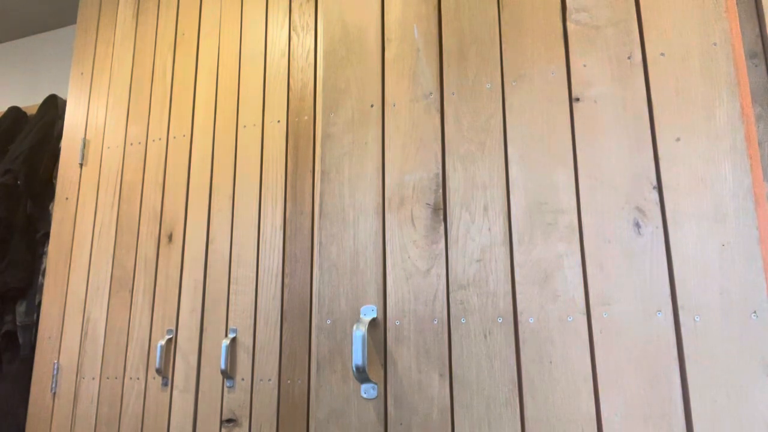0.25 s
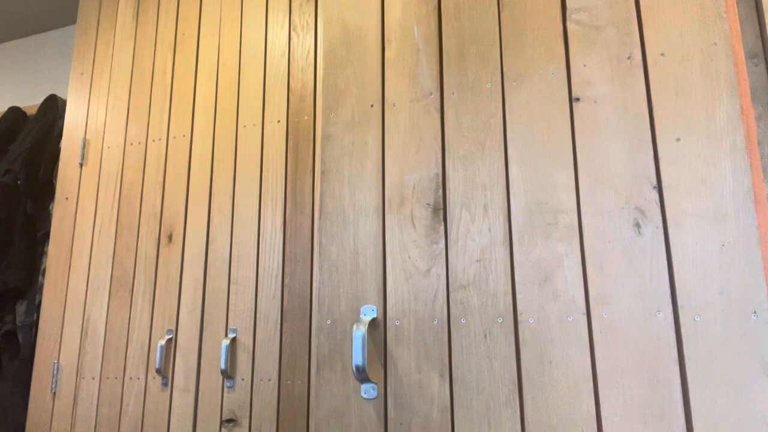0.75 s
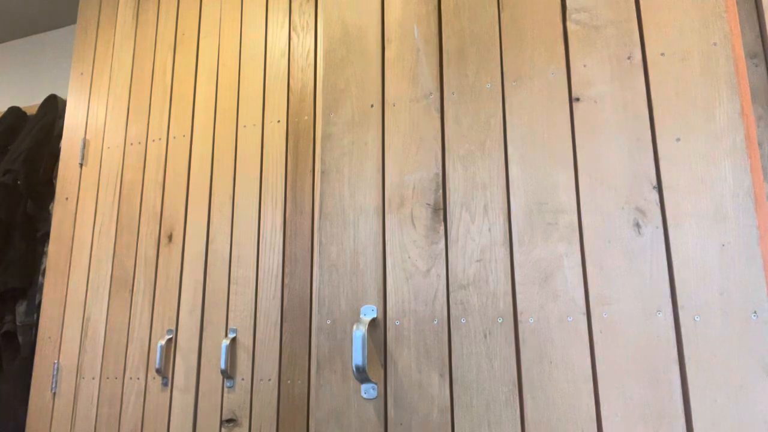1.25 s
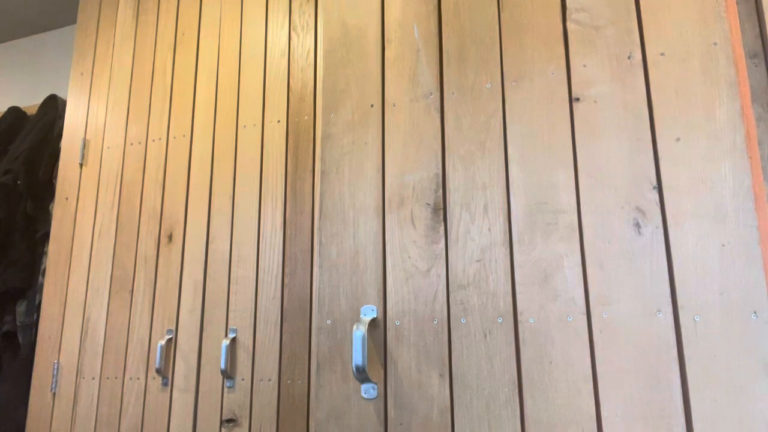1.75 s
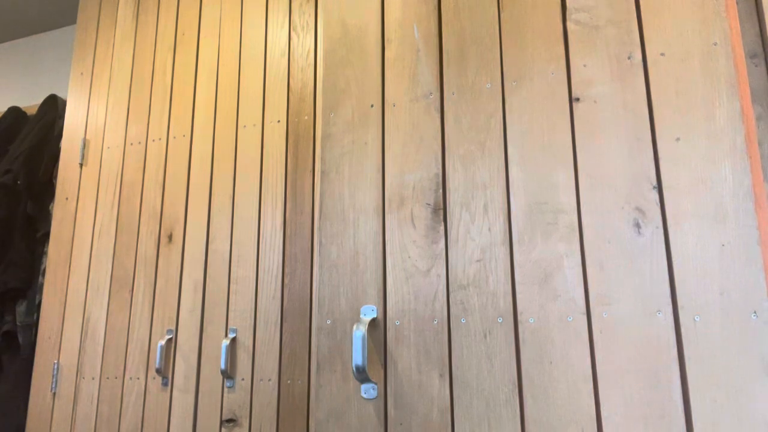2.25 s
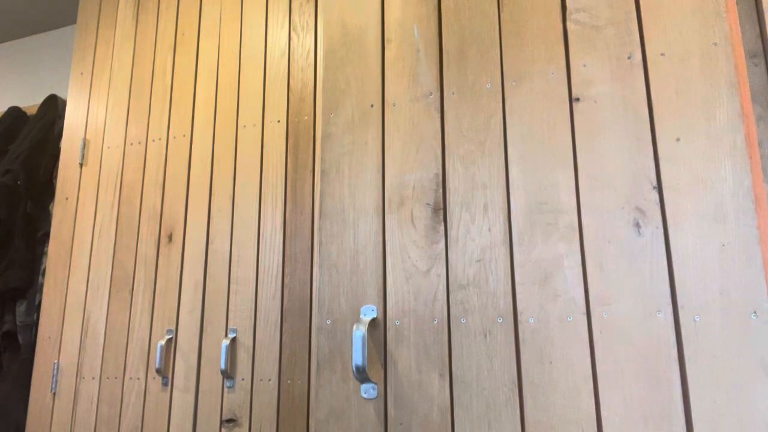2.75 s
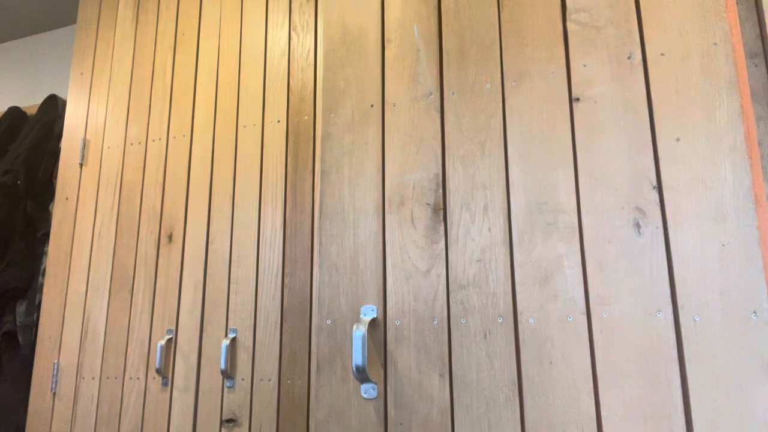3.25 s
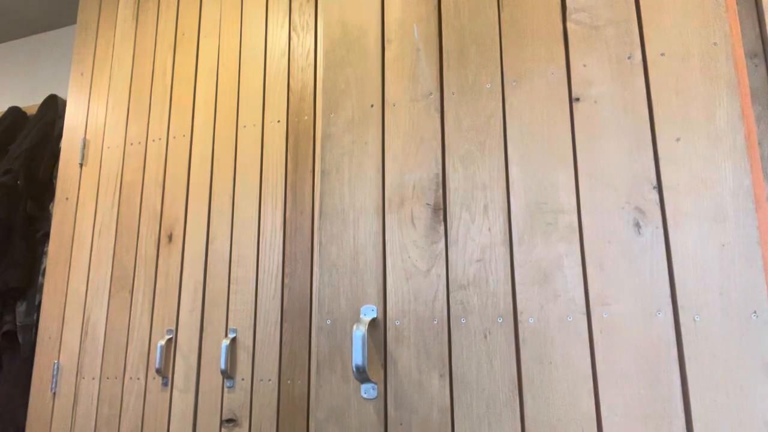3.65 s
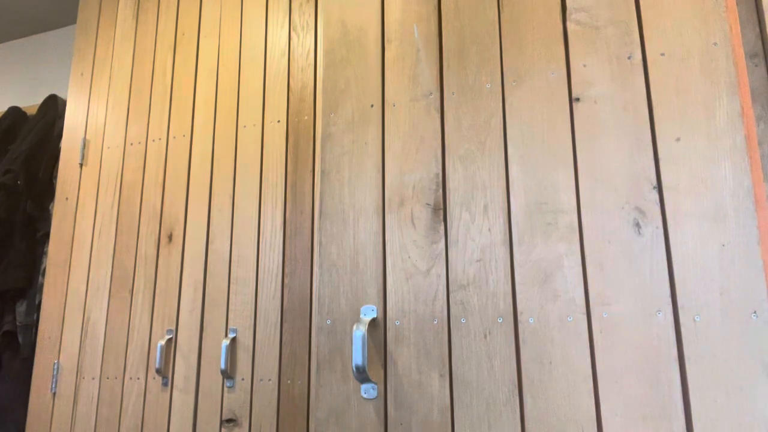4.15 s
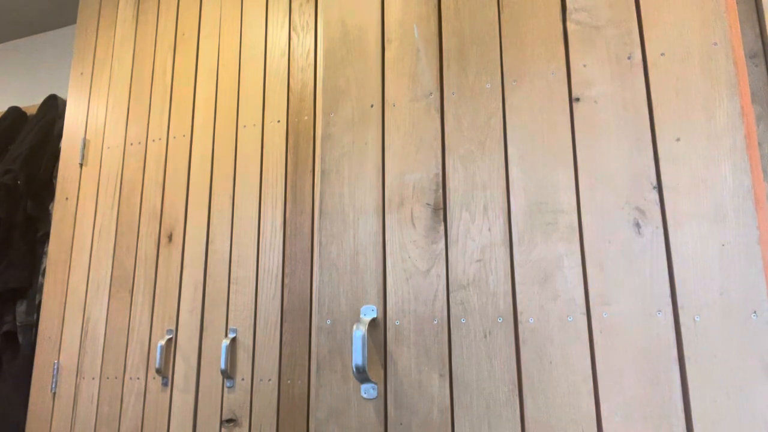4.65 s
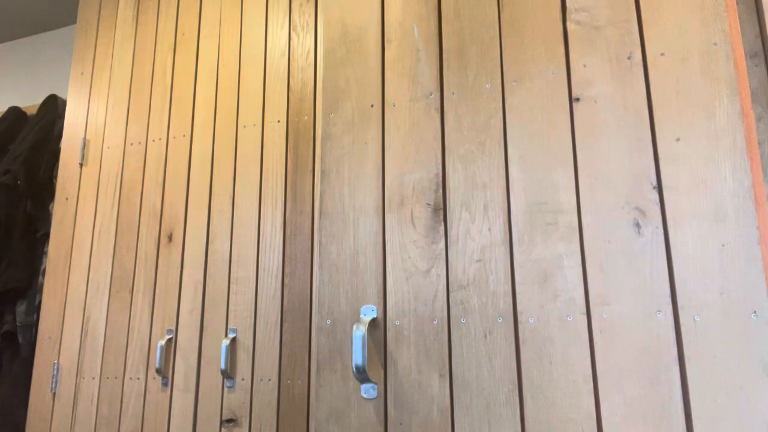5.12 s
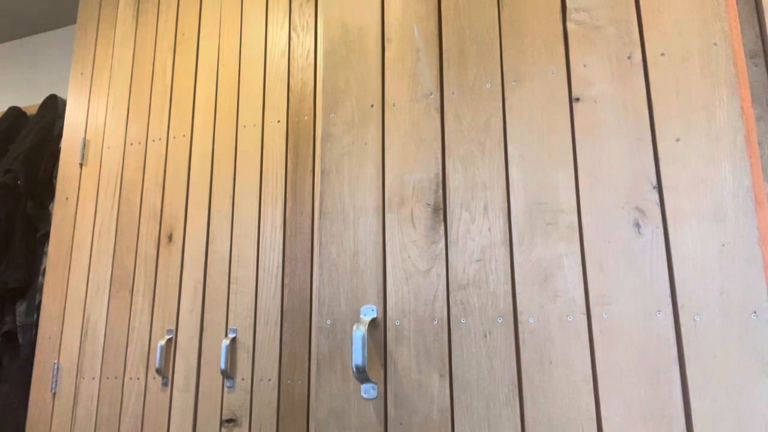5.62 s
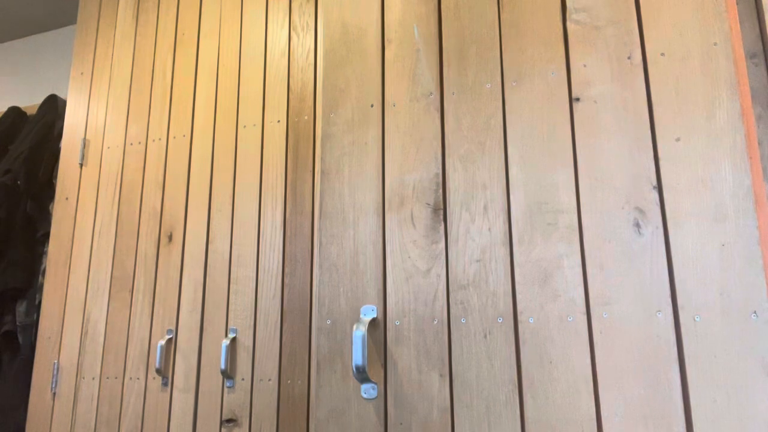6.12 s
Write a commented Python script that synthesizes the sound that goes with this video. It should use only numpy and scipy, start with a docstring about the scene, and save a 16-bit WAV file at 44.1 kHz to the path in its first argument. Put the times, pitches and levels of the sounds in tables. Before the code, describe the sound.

A clothes dryer runs for about six and a half seconds, heard from outside the closed wooden doors of a closet. A steady low motor and blower hum sits on a cabinet rumble, which swells slightly around 0.7, 1.5, 4.6 and 6 seconds. From the start, laundry lands in the steel drum with soft, irregular, dully ringing thumps, several a second, each blurred by the closet's short echo. Clearer ones fall near 1.1, 2 and 3.3 seconds, the strongest at 5.3, and another at 6.3. Zips and buttons click and jingle lightly on the steel, often together with the thumps, most noticeably around 1.1, 2.2, 3.3 and 4.3 seconds. At about 3 seconds a brief, soft mechanical moan slides down in pitch. Cloth rubs faintly along the drum throughout, over a very faint microphone hiss.

```python
"""Clothes dryer in a closet

Behind closed plank doors, falling laundry thumps the steel drum while zips and buttons clatter on it.
The closet's echoes blur every blow. Air and rolling noise rumble in the cabinet, and the motor, blower
and drum roller hum. Cloth rubs the drum, a brief moan falls in pitch, and the microphone hisses."""
import sys
import numpy as np
from scipy import signal
from scipy.fft import rfft, irfft, next_fast_len
from scipy.io import wavfile
from scipy.ndimage import uniform_filter1d

SR = 44100
rng = np.random.default_rng(int(sys.argv[2]) if len(sys.argv) > 2 else 0)


def dump_mix(stems):
    """Bounce the given channels to the path in sys.argv[1] as a 16-bit WAV at rate SR."""
    frames = np.atleast_2d(stems).T  # one column per channel
    limited = np.clip(frames, -1, 1)  # hard clip at full scale
    pcm = np.round(limited * 32767).astype(np.int16)
    wavfile.write(sys.argv[1], SR, pcm)


N = 281358
T = np.arange(N) / SR
LEAD_S = 0.01006   # clatter starts this long before its listed time, a thump a little less


# The notes at which the steel drum rings, heard through the doors.
# Each row: pitch in Hz, width in Hz, level in dB.
DRUM_NOTES = [(209.3, 7.1, 9.5), (400.8, 19, 2.5), (501, 11, -2.5), (571, 43, -10), (711.4, 18, -2),
              (761, 18, 0), (814, 24, -4.5), (879.6, 51, -3), (947, 19, -1), (973, 28, -5),
              (1040.6, 25, 0.5), (1077.4, 24, -3.5), (1140, 29, -2.5), (1220, 37, -11.5), (1282, 40, -7.5),
              (1375, 31, -6.5), (1448.6, 26, -6.5), (1537, 43, -7), (1652, 50, -10), (1790, 48, -13.5),
              (2040, 80, -17.5), (2370, 110, -22.5), (2520, 100, -36)]
# The laundry lands. Each row: time in seconds, peak level in dB, centre pitch in Hz,
# spread to either side in octaves, seconds for the echo to fade by 60 dB.
LANDINGS = [(0.072, -39, 1230, 0.46, 0.13), (0.098, -39.5, 1090, 0.46, 0.29),
            (0.306, -43, 1140, 0.65, 0.41), (0.44, -50.5, 1310, 1.1, 0.37), (0.652, -60, 740, 0.13, 0.22),
            (0.916, -44.5, 814, 0.88, 0.3), (1.113, -35, 940, 0.86, 0.23), (1.169, -43, 953, 1.1, 0.27),
            (1.518, -46, 770, 0.59, 0.97), (1.652, -47, 835, 1.1, 0.78), (1.741, -47, 1090, 0.47, 0.1),
            (1.977, -36.5, 1260, 0.54, 0.3), (2.139, -46, 780, 0.92, 0.27),
            (2.243, -42.5, 1330, 0.49, 0.43), (2.33, -44, 1470, 0.24, 0.13),
            (2.451, -54.5, 800, 0.84, 0.65), (2.763, -48, 910, 0.5, 0.27), (2.852, -47.5, 1220, 0.16, 0.33),
            (3.071, -42, 795, 0.85, 0.46), (3.291, -39.5, 910, 0.56, 0.35), (3.338, -40, 1030, 0.51, 0.37),
            (3.351, -43, 235, 0.13, 0.17), (3.655, -53, 940, 0.35, 0.29), (3.669, -39.5, 228, 0.16, 0.16),
            (3.817, -48, 1110, 0.84, 0.35), (3.891, -47, 1120, 0.21, 0.24), (3.986, -60, 744, 0.29, 0.26),
            (4.306, -40, 1260, 0.57, 0.75), (4.454, -56, 1150, 0.77, 0.079),
            (4.586, -50.5, 744, 0.49, 0.15), (5.028, -35, 1240, 0.17, 0.073),
            (5.066, -46.5, 1190, 0.2, 0.22), (5.258, -32.5, 826, 0.99, 0.48), (5.27, -34, 236, 0.086, 0.22),
            (5.284, -28.5, 830, 0.77, 0.25), (5.498, -53.5, 980, 0.31, 0.25),
            (5.919, -59.5, 770, 0.24, 0.14), (5.987, -54, 673, 0.33, 0.98), (6.268, -50, 1310, 0.36, 0.43),
            (6.307, -34.5, 1050, 0.51, 0.28)]

def laundry_thumps():
    """Each landing rings the drum notes near its centre pitch, and the closet's echo draws it out."""
    out, length = np.zeros(N + SR), SR // 2
    t = T[:length]
    spots_db = 2.7 * rng.standard_normal((len(LANDINGS), len(DRUM_NOTES)))
    for (time_s, db, centre_hz, spread, fade_s), spot_db in zip(LANDINGS, spots_db):
        strike = 0.89 * swell(t, rise_s=0.0016, fade_s=0.018)
        echo = swell(t, rise_s=0.004, fade_s=fade_s)
        burst = rng.standard_normal(length) * (strike + echo)
        # The size and softness of the piece set its range of pitches.
        edges_hz = centre_hz * 2 ** (np.array([-1, 1]) * np.clip(spread, .1, 2))
        burst = keep_band(burst, edges_hz)
        # Each spot on the drum favours different notes.
        notes = [(hz, width, level + extra) for (hz, width, level), extra in zip(DRUM_NOTES, spot_db)]
        ring = ring_notes(burst, notes)
        start = round((time_s - .8 * LEAD_S) * SR)
        out[start:start + length] += from_db(db) * ring / np.abs(ring).max()
    return out[:N]


# The tone of the clatter's four layers, from low to high. Each row: pitch in Hz, relative level in dB.
KNOCK_TONE = [(1500, -18), (1900, -1.5), (2400, -8.5), (2700, -11.5), (3100, -38.5)]
CLINK_TONE = [(2400, -30), (2800, -4.5), (3300, 3.5), (3800, 3.5), (4400, -35)]
JINGLE_TONE = [(3300, -39), (3900, -9.5), (4400, -4), (5800, 0), (7400, -5.5), (8300, -14), (9200, -25.5),
               (10500, -39.5)]
TOP_RING_TONE = [(8500, -15.5), (9800, -5), (11000, 1), (11800, -10), (12300, -28), (15000, -33.5)]
# Zips and buttons hit the drum. Each row: time in seconds, level of the jingle at its loudest in dB,
# level of the knock and level of the top ring, both in dB compared with the jingle.
ZIP_HITS = [(0.0705, -59.5, -3.5, -23), (0.128, -57.5, -21, -23), (0.3046, -59, -9.5, -19),
            (0.441, -75.5, -13, -16), (0.9194, -81, -5, -25), (0.9861, -72, -7, -19),
            (1.1183, -61.5, -2, -18), (1.1407, -52, -14, -20), (1.3258, -70.5, -9, -28),
            (1.5594, -81.5, -2, -22), (1.8494, -81.5, -8, -27), (1.974, -61, -2.5, -27),
            (2.1315, -75.5, -13, -25), (2.241, -57, -12, -16), (2.309, -61.5, -7, -18),
            (2.767, -85, -8, -20), (2.8594, -85, -14, -20), (3.073, -59.5, -26, -17),
            (3.2255, -62, -12.5, -22), (3.299, -51.5, -14, -20), (3.8294, -80, -7.5, -18),
            (4.3, -52, -9.5, -18), (4.385, -62, -13, -24), (4.589, -79.5, 0, -28), (5.0179, -74, -16, -28),
            (5.163, -60, -25, -20), (5.2605, -59.5, -1, -34), (5.334, -59, -10.5, -20),
            (6.1794, -77, -12, -20), (6.3015, -64, -3, -19)]

def zip_clatter():
    """Zips and buttons rattle on steel and echo in the closet; each hit blends four layers its own way."""
    power, t = np.zeros((4, N + SR)), T[:SR // 2]
    fades_s = [0.24, 0.25, 0.22, 0.18]   # knock, clink, jingle, top ring
    shapes = np.array([swell(t, rise_s=0.024, fade_s=fade_s, bend=1.17) for fade_s in fades_s])
    for time_s, db, knock_db, top_db in ZIP_HITS:
        start = round((time_s - LEAD_S) * SR)
        clink_db = -8.5 + 0.58 * knock_db   # the clink partly follows the knock
        levels = from_db(db + np.array([[knock_db], [clink_db], [0], [top_db]]))
        power[:, start:start + len(t)] += (levels * shapes) ** 2
    grain = from_db(0.82 * wobble(samples=50))   # the tiny contacts are uneven
    tones = (KNOCK_TONE, CLINK_TONE, JINGLE_TONE, TOP_RING_TONE)
    # The steel's countless close notes put ripples in the tone.
    layers = np.array([shaped_noise(tone, ripple_db=2.5) for tone in tones])
    return grain * np.sum(np.sqrt(power[:, :N]) * layers, axis=0)


# The low notes of the cabinet and closet. Each row: pitch in Hz, width in Hz, level in dB.
CABINET_NOTES = [(48.7, 3.6, -13), (67.5, 6, -2.5), (75.03, 5.2, -1), (89.1, 11.1, -12), (106, 7.2, -9.5),
                 (140.84, 3.9, 3), (179.2, 9.3, -11), (199.6, 11.8, -13.5), (217.8, 15.6, -12),
                 (232.2, 8.45, -11.5), (289.5, 10.8, -20), (327.7, 9.9, -23), (390.7, 67, -32.5),
                 (423.5, 6, -30.5), (469, 5.1, -34.5)]
# The low rumble swells briefly now and then.
# Each row: time in seconds, level of the added rumble in dB compared with the steady one.
RUMBLE_SWELLS = [(0.49, -8.5), (0.69, -1.5), (1.52, 1), (4.64, 2.5), (5.96, 3)]
STEADY_RUMBLE_DB = -40

def cabinet_rumble():
    """Swirling air and rolling noise ring the cabinet; the rumble swells briefly now and then."""
    power, length, rise_s = np.ones(N + SR), SR // 2, 0.024
    for time_s, db in RUMBLE_SWELLS:
        start = round((time_s - rise_s) * SR)
        power[start:start + length] += (from_db(db) * swell(T[:length], rise_s, fade_s=0.86)) ** 2
    noise = keep_band(rng.standard_normal(N + SR), [42, 700], order=4)
    ring = ring_notes(noise, CABINET_NOTES)[SR:]   # skip the first second, while the ringing builds
    return from_db(STEADY_RUMBLE_DB) * np.sqrt(power[:N]) * unit_level(ring)


ROLLER_TURNS_PER_S = 6.735
# The roller beats once each time it turns. Each row: multiple of its turning rate, level in dB.
ROLLER_TONES = [(7, -62), (9, -59), (10, -54), (11, -48), (12, -57), (13, -53), (14, -60), (15, -61),
                (17, -63), (20, -55), (21, -56), (22, -56)]
# The motor's magnetic hum, then the blower's tone: their pitches in Hz and their levels in dB.
MOTOR_BLOWER_HZ = [120.01, 149.53]
MOTOR_BLOWER_DB = [-53, -44]

def machine_hum():
    """The drum roller, motor and blower run at fixed speeds, so they make steady tones."""
    tones = [(multiple * ROLLER_TURNS_PER_S, db) for multiple, db in ROLLER_TONES]
    tones += zip(MOTOR_BLOWER_HZ, MOTOR_BLOWER_DB)
    phases = rng.uniform(0, 2 * np.pi, len(tones))
    return sum(np.sqrt(2) * from_db(db) * np.sin(2 * np.pi * hz * T + phase)
               for (hz, db), phase in zip(tones, phases))


# How loudly cloth slides along the drum wall. Each row: time in seconds, level in dB.
SLIDE_LEVELS = [(0.0, -63), (0.85, -66), (1.03, -62), (3.14, -65.5), (3.22, -64), (4.18, -69.5),
                (5.28, -56.5), (5.7, -69), (6.38, -65)]

def sliding_cloth():
    """Cloth rubs the drum unevenly all the time and keeps its middle notes softly ringing."""
    times_s, levels_db = np.transpose(SLIDE_LEVELS)
    rubbing = rng.standard_normal(N) * from_db(2.1 * wobble(samples=500) + 1.7 * wobble(samples=3000))
    dull_ring = keep_band(ring_notes(rubbing, DRUM_NOTES[3:]), [600, 1500])
    return from_db(np.interp(T, times_s, levels_db)) * unit_level(dull_ring)


def falling_moan():
    """A soft, unsteady tone comes and goes once, sliding down in pitch."""
    peak_s, peak_db, peak_hz = 2.97, -51, 411   # at its loudest moment
    drop_hz_per_s, rise_db_per_s, fall_db_per_s = 330, 153, 146
    t = T - peak_s
    hz = peak_hz - drop_hz_per_s * t + 11.0 * wobble(samples=600)
    phase = 2 * np.pi * np.cumsum(hz) / SR
    level_db = peak_db + np.minimum(rise_db_per_s * t, -fall_db_per_s * t)
    return np.sqrt(2) * from_db(level_db + 1.3 * wobble(samples=600)) * np.sin(phase)


# The tone of the background hiss. Each row: pitch in Hz, relative level in dB.
HISS_TONE = [(200, -20.5), (350, 1), (650, -1.5), (1200, -5.5), (1800, -32.5), (2300, -27.5), (8000, -28.5),
             (10500, -33), (13000, -36), (15200, -40.5)]

def background_hiss():
    """A faint, steady microphone hiss."""
    return from_db(-65) * shaped_noise(HISS_TONE)


def from_db(db):
    """Turn decibels into a number to multiply a sound by."""
    return 10 ** (np.asarray(db) / 20)


def unit_level(x):
    """Scale a signal so that its average level (rms) is 1."""
    return x / np.sqrt(np.mean(x ** 2) + 1e-20)


def wobble(samples):
    """A random drift, about 1 in size; more samples make it slower."""
    smoothed = uniform_filter1d(rng.standard_normal(N), size=samples)
    return unit_level(uniform_filter1d(smoothed, size=samples))


def swell(t, rise_s, fade_s, bend=1):
    """Rise to 1, then fade by about 60 dB at fade_s; a bend above 1 speeds up the end."""
    rise = (1 - np.exp(-t / rise_s)) ** 1.4
    shape = rise * from_db(-60 * (t / fade_s) ** bend)
    return shape / shape.max()


def keep_band(x, edges_hz, order=2):
    """Keep the pitches between two edges and turn down the rest."""
    return signal.sosfilt(signal.butter(order, edges_hz, "band", fs=SR, output="sos"), x)


def ring_notes(x, notes):
    """Let a sound ring all of an object's notes, every second one flipped; narrow notes ring longer."""
    out = np.zeros(len(x))
    for k, (hz, width_hz, db) in enumerate(notes):
        decay = np.exp(-np.pi * width_hz / SR)
        feed = (1 - decay ** 2) / 2 * np.array([1, 0, -1])
        feedback = [1, -2 * decay * np.cos(2 * np.pi * hz / SR), decay ** 2]
        out += (-1) ** k * from_db(db) * signal.lfilter(feed, feedback, x)
    return out


def shaped_noise(tone, ripple_db=0, ripple_width_hz=39):
    """Noise at level 1 that follows a tone table, with random ripples in the tone if asked."""
    size = next_fast_len(N)
    hz, level_db = np.transpose(tone)
    bins_hz = np.fft.rfftfreq(size, 1 / SR)
    ripple_bins = round(ripple_width_hz / bins_hz[1])
    ripple = unit_level(uniform_filter1d(rng.standard_normal(len(bins_hz)), size=ripple_bins))
    gain_db = np.interp(np.log(bins_hz + 1), np.log(hz), level_db, left=-150)
    spectrum = rfft(rng.standard_normal(size)) * from_db(gain_db + ripple_db * ripple)
    return unit_level(irfft(spectrum, size)[:N])


def scene():
    """Add all the sounds together in one channel."""
    machine = machine_hum() + cabinet_rumble()
    laundry = sliding_cloth() + laundry_thumps() + zip_clatter()
    mix = machine + laundry + falling_moan() + background_hiss()
    return mix[None]


def record(dry):
    """Cut away the very highest treble."""
    cutoff_hz = 15500
    return signal.sosfilt(signal.cheby2(20, 70, cutoff_hz, fs=SR, output="sos"), dry)


dry = scene()
out = record(dry)
dump_mix(out)
```